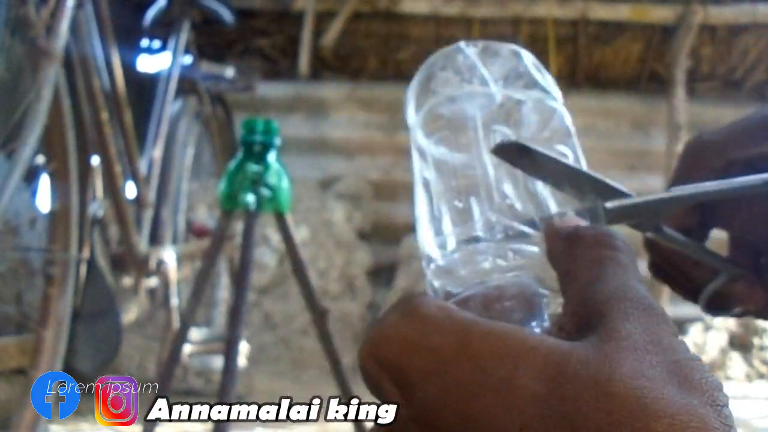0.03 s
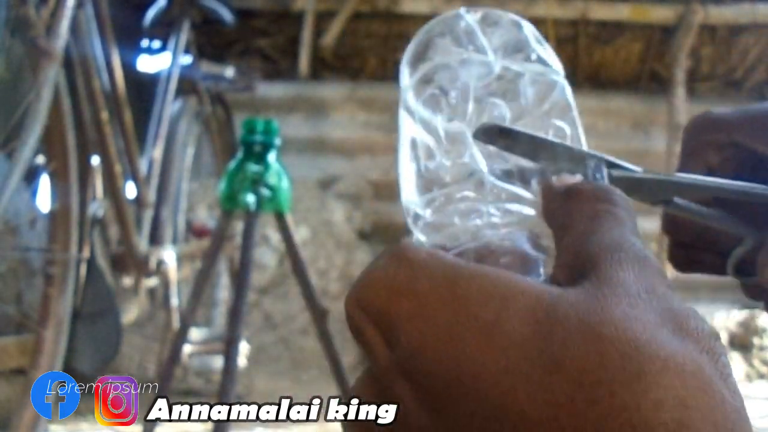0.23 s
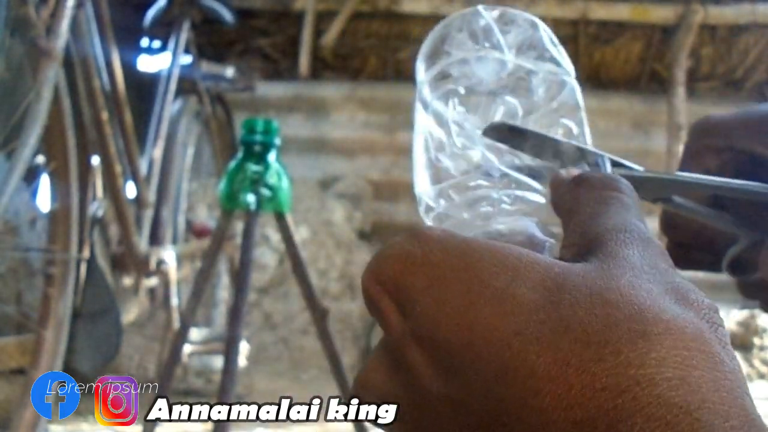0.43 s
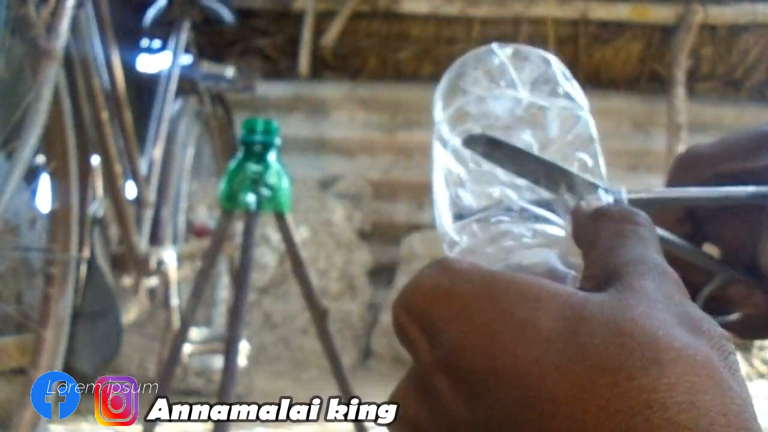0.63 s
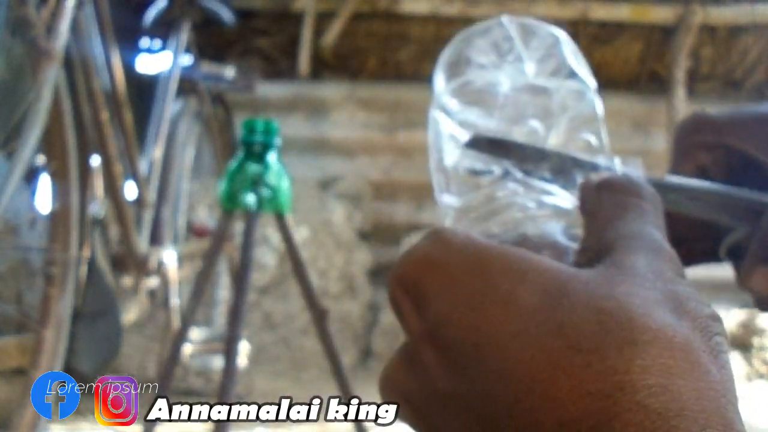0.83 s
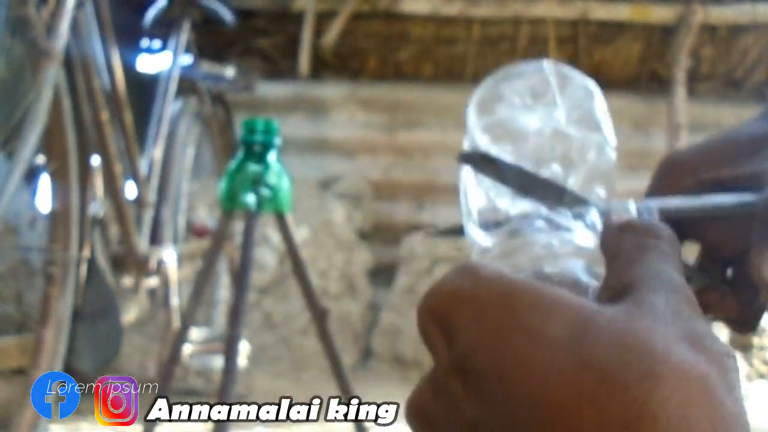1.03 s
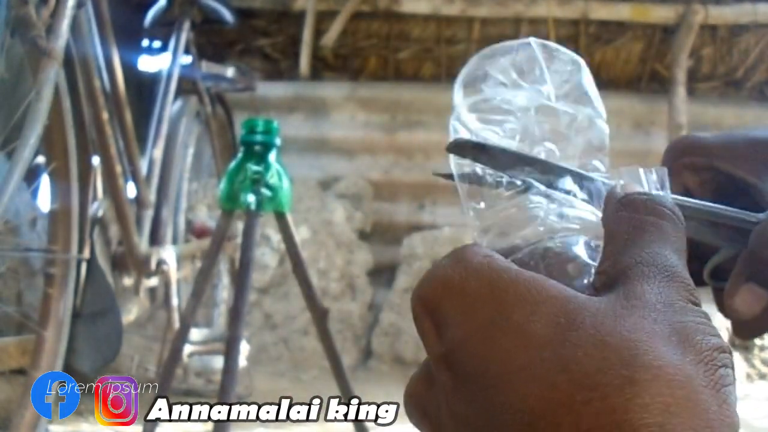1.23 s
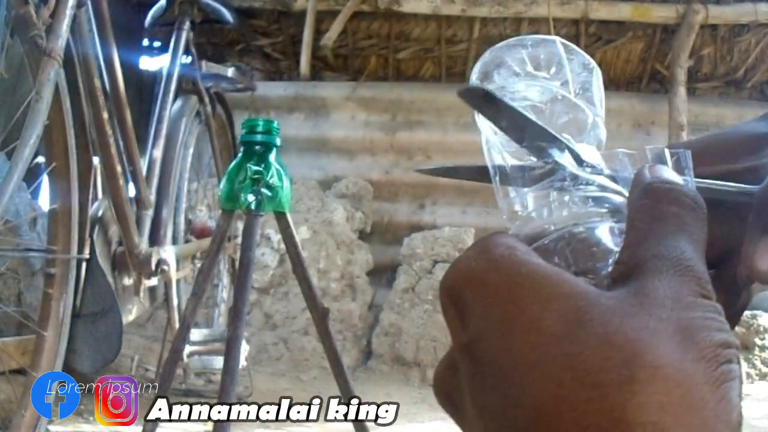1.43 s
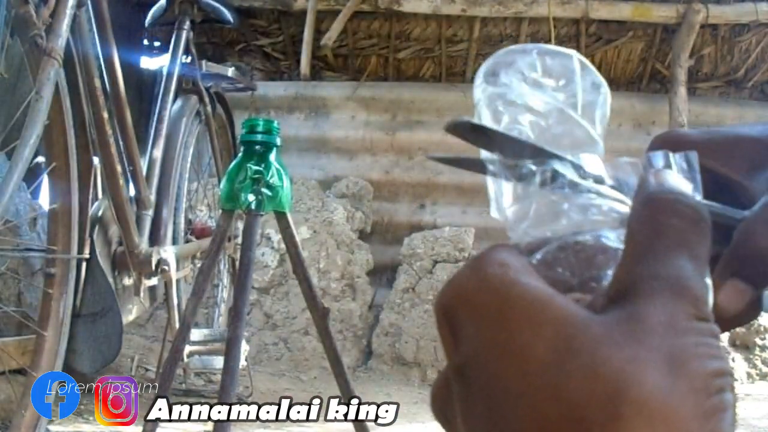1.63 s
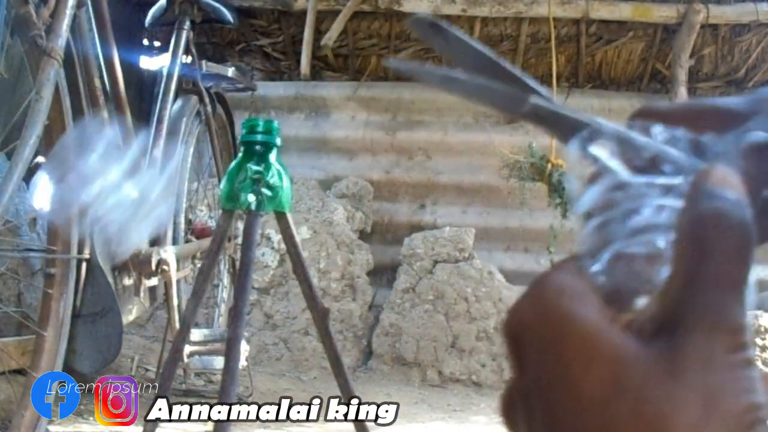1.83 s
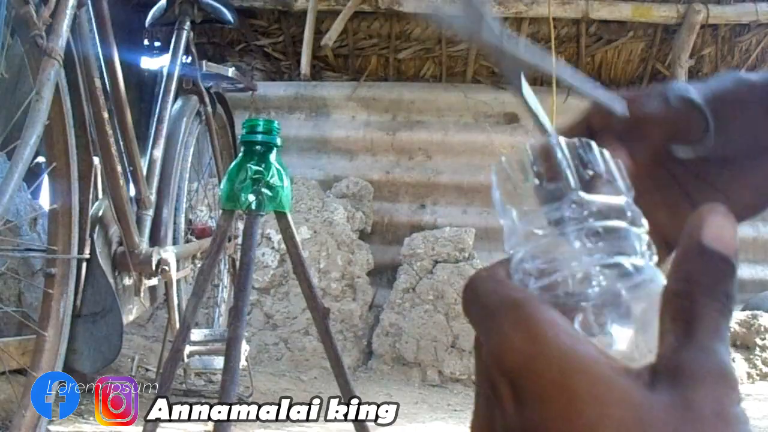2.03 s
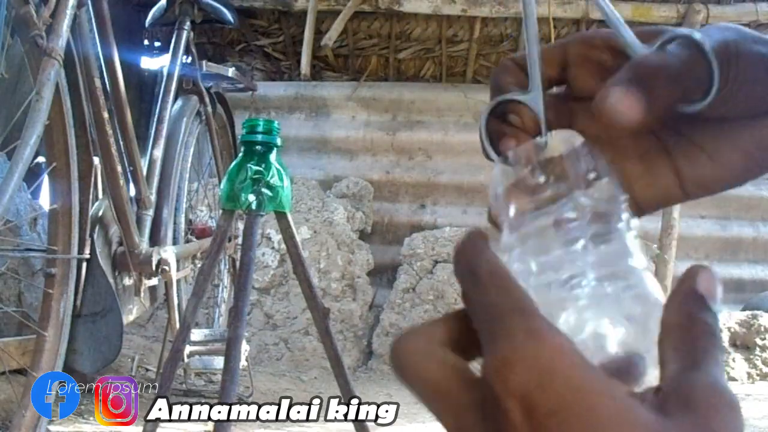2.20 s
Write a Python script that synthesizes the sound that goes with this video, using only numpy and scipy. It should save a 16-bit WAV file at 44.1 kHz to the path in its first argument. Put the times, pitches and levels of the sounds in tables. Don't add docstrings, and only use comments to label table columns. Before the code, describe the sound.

Close, crisp scissor cuts crackle through a thin plastic bottle, ending in a rattling flurry of pops

```python
import sys
import numpy as np
from scipy import signal
from scipy.io import wavfile
from scipy.ndimage import uniform_filter1d

SR = 44100
rng = np.random.default_rng(int(sys.argv[2]) if len(sys.argv) > 2 else 0)


def store_pcm(level_fs):
    pcm = np.round(np.clip(level_fs, -1, 1) * 32767).astype(np.int16)
    wavfile.write(sys.argv[1], SR, np.atleast_2d(pcm).T)


def decibels_to_gain(level_db):
    exponent = np.asarray(level_db, float) / 20
    return 10 ** exponent


N = 99798

# t/s, peak level/dB, low panel f/Hz, high panel f/Hz, high level re low/dB
SNAPS = [(0.165, -19, 1090, 2500, -10), (0.408, 0.5, 905, 2198, 8.5), (0.409, -1, 1593, 3257, 12),
         (1.237, -0.5, 1226, 3300, 6.5), (1.238, -1.5, 805, 2268, 12), (1.628, -8, 836, 2400, -12),
         (1.63, -8, 1335, 2070, -12.5), (1.635, -20.5, 863, 1360, -31), (1.721, -9, 1287, 2790, -1.5),
         (1.738, -2, 1084, 3164, 10.5), (1.744, -2, 1030, 1880, 0.5), (1.749, -17, 1120, 3300, 14),
         (1.95, -1, 1176, 2940, 4.5), (1.951, -10.5, 1180, 1900, 7), (2.077, -8.5, 1472, 1900, -19),
         (2.114, -9, 1422, 2820, -37), (2.119, -6.5, 1060, 1740, -50), (2.128, -15.5, 1160, 1990, -13.5)]
CRACKS = [(0.115, -12, 1260, 2100, 3), (0.1565, -5.5, 1510, 2700, 11.6), (0.3575, -11.5, 1265, 2020, 0.82),
          (0.697, -13.5, 1340, 1840, 5), (0.794, -19.5, 1480, 3320, 3.8), (0.8, -16, 1220, 2080, 6.2),
          (0.961, -12, 1460, 2120, 19), (0.978, -11.5, 1500, 1870, 2.3), (1.253, -2.5, 765, 3100, 10.4),
          (1.329, -4.5, 900, 3110, 10), (1.33, -7, 1400, 2200, 0.63), (0.157, -24, 2040, 3700, 1.2),
          (1.869, -17, 1006, 1990, 0.43)]
TICKS = [(0.09, -36.5, 1260, 1930, 29), (0.235, -32, 1710, 2780, 8), (0.293, -39.5, 1090, 3380, 12),
         (0.337, -28.5, 560, 2500, 2), (0.346, -29, 1380, 1870, 18), (0.469, -28, 1240, 2900, 4),
         (0.488, -21.5, 930, 1930, 3), (0.492, -23.5, 1230, 1900, -9), (0.509, -20.5, 876, 2570, -23),
         (0.532, -19.5, 1110, 2460, 19), (0.484, -33, 1180, 3000, 1), (0.555, -26.5, 980, 2400, 1),
         (0.625, -43, 920, 2300, -6), (0.664, -24.5, 810, 1870, 5.5), (0.682, -25, 1330, 1860, -2),
         (0.731, -35.5, 1480, 4200, 12), (0.765, -24, 830, 3200, 2.5), (0.825, -29.5, 1580, 2780, 21),
         (0.85, -47, 880, 3500, -2), (0.893, -47.5, 1120, 2100, 8), (0.929, -36, 1360, 2260, 11),
         (0.936, -36, 1350, 2900, 3), (1.305, -44, 1400, 3170, -8), (0.947, -23.5, 1560, 4300, 31),
         (0.9995, -20, 1400, 3200, 14), (1.155, -32, 835, 2960, -1), (1.183, -21, 1390, 3300, 29.5),
         (1.223, -22, 1180, 2200, 19), (1.392, -26.5, 895, 2220, 2), (1.405, -18, 940, 3260, 10),
         (1.446, -26, 1390, 3200, -2), (1.502, -40.5, 1170, 3200, 10), (1.537, -19, 870, 3200, 18),
         (1.548, -28.5, 930, 3300, -1), (1.557, -28, 898, 3300, -25), (1.572, -30.5, 1290, 3200, -20),
         (1.587, -39.5, 1460, 3200, 4), (2.18, -46, 900, 4200, -9), (1.825, -33, 1430, 1870, -12.5),
         (2.21, -24, 1296, 2060, -15.5)]
# start t/s, length/s, level/dB, peak position/fraction of length, treble level/dB
STROKES = [(0.128, 0.076, -35.5, 0.56, -5.5), (0.195, 0.14, -47, 0.24, 0), (0.316, 0.041, -53.5, 0.41, 0.5),
           (0.408, 0.049, -37, 0.14, 8.5), (0.448, 0.039, -41, 0.6, -3), (0.48, .11, -30, 0.23, -3),
           (0.629, 0.13, -41, 0.63, 0), (.75, 0.072, -32.5, 0.74, 0.5), (0.843, 0.029, -52, .2, 0),
           (0.929, 0.054, -34.5, 0.72, 1), (0.973, 0.083, -26, 0.59, 0.5), (1.05, 0.055, -50.5, 0.13, -5),
           (1.126, 0.24, -40, 0.083, -1.5), (1.211, 0.078, -36.5, 0.42, -2), (1.379, 0.14, -35.5, 0.48, 1),
           (1.532, 0.13, -41.5, 0.12, -3.5), (1.596, 0.11, -39.5, 0.41, -5),
           (1.689, 0.058, -45.5, 0.82, -4), (1.735, 0.035, -26.5, 0.05, 7), (2.078, 0.13, -42, 0.039, -23)]
# f/Hz, width/Hz, level/dB
WALL = [(432, 306, 4), (620, 434, 9.5), (830, 262, 8.5), (1400, 258, 9.5), (2010, 805, 3), (2795, 496, 5.5),
        (3300, 765, -1.5), (4440, 560, -8), (6320, 460, -18.5), (7970, 586, -10), (9550, 370, -41.5)]
WALL_DRIFT = [-9, -11, -0.2, -0.24, 0.5, 0.47, 0.83, -1.7, -1.2, 0.1, 11.2]
# f/Hz, level/dB, T60/s
CUP_MODES = [(465, -17, .15), (650, -27.5, .1), (1087, 0, .15), (1180, -8.5, 0.54), (1421, -14, 0.34),
             (1561, -10, 0.089), (1900, -2, 0.047), (1950, -26.5, 0.33), (2070, -14.5, 0.17),
             (2580, -13.5, 0.087), (3200, -27, 0.11), (3500, -38, 0.068), (4730, -46, 0.15)]
# t/s, level/dB
CUP_HITS = [
    (1.251, -54),
    (1.628, -36),
    (1.736, -24.5),
    (1.867, -42.5),
    (1.952, -34.5),
    (2.079, -23),
    (2.118, -17),
]
# f/Hz, level/dB, T60/s
BLADE_MODES = [(6700, -12, .08), (7550, -23, .15), (8000, -18, 0.044), (8400, 2, 0.058), (9100, -2, 0.15),
               (9100, -14, .15), (9580, -5, .12), (9945, 12, 0.1)]
# t/s, level/dB
BLADE_HITS = [
    (1.738, -60),
    (1.951, -63),
    (2.076, -58),
    (2.115, -51.5),
]
# f/Hz, level/dB, T60/s
SETTLE_MODES = [(369, 0, 0.31)]
# t/s, level/dB
SETTLE_HITS = [(2.164, -52)]
# t/s, level/dB, time to peak/ms
PUFFS = [
    (0.41, -8.5, 0.32),
    (1.237, -44, 0.62),
    (1.63, -58, 0.93),
    (1.738, -30, 0.56),
    (1.948, -57, 2.6),
    (0.164, -45, 0.93),
]
# t/s, level/dB, f/Hz
THUNKS = [(0.18, -34.5, 216), (.26, -35.5, 450), (0.32, -33, 460), (.358, -24, 406), (2.1, -18.5, 560),
          (2.4, -23.5, 290), (.766, -31.5, 510), (0.69, -24, 516), (1.872, -30, 298), (2.086, -40, 315)]
# f/Hz, level/(dB per Hz)
SHED_SPECTRUM = [(30, 6.5), (100, -0.5), (300, 5.5), (700, 5.5), (1500, 0.5), (3000, -10.5), (5500, -54),
                 (9000, -58)]
# f/Hz, level/dB
HUM = [(1421, -59), (1933, -65.5)]
# t/s, level/dB
HUM_SWELL = [(0, -0.3), (.3, -13), (1.6, -10.5), (1.8, -2.7)]
# f/Hz, width/Hz, depth/fraction
PORT_DIP = (5840, 2040, 0.2)


def band(x, hz, width):
    return signal.lfilter(*signal.iirpeak(hz, hz / width, fs=SR), x)


def unit(x):
    return x / np.sqrt(np.mean(x ** 2))


def fade(t, t60):
    return np.exp(-np.log(1000) * t / t60)


def tone(hz, t):
    return np.sin(2 * np.pi * hz * t)


def add(out, at, x):
    i = int(at * SR)
    out[i:i + len(x)] += x[:len(out) - i]


def wall(drive):
    drive = np.broadcast_to(drive, (len(WALL), N))
    rows = []
    for k, (hz, width, db) in enumerate(WALL):
        sign = (-1) ** k
        rows.append(sign * decibels_to_gain(db) * band(drive[k], hz, width))
    rows = np.array(rows) * decibels_to_gain(np.outer(WALL_DRIFT, np.arange(N) / SR))
    highpass = signal.butter(2, 560, "high", fs=SR, output="sos")
    rows[2:] = signal.sosfilt(highpass, rows[2:])
    return rows


def buckles():
    panel_t60_s, high_t60_s, rise_s = 0.036, 0.017, 0.002
    crack_t60_s, rattle_t60_s, rattle_db = 0.017, 0.057, -29
    split_t60_s, split_db, crack_lows_db = 0.0038, -27.5, -5
    t = np.arange(SR // 8) / SR
    rings, cracks, splits = np.zeros((3, N))
    for table, ring, crack_db in ((SNAPS, 0.8, -6), (CRACKS, 0.52, -7.5), (TICKS, 0.65, -7.5)):
        rise = 1 - fade(t, rise_s * ring)
        crack = decibels_to_gain(crack_db) * fade(t, crack_t60_s * ring)
        rattle = decibels_to_gain(rattle_db) * fade(t, rattle_t60_s)
        split = decibels_to_gain(crack_db + split_db) * fade(t, split_t60_s)
        for at, db, low_hz, high_hz, high_db in table:
            low = tone(low_hz, t) * fade(t, panel_t60_s * ring)
            high = tone(high_hz, t) * fade(t, high_t60_s * ring)
            panels = low * decibels_to_gain(-max(high_db, 0)) + high * decibels_to_gain(min(high_db, 0))
            add(rings, at, decibels_to_gain(db) * rise * panels)
            noise = rng.standard_normal(len(t)) * decibels_to_gain(db + min(high_db, 0) / 2)
            add(cracks, at, noise * rise * (crack + rattle))
            add(splits, at, noise * split)
    rows = 3 * wall(cracks)
    through_wall = decibels_to_gain(crack_lows_db) * rows[:3].sum(axis=0) + rows[3:].sum(axis=0)
    return rings + through_wall + band(splits, 9000, 4200)


def shear():
    grit_per_s, spread_db, largest_db = 1500, 3.8, 14
    smooth_db, flicker_db, shared = -2.5, 2.5, 0.68
    t = np.arange(N) / SR
    low, high = np.zeros((2, N))
    for at, length, db, peak, treble_db in STROKES:
        u = (t - at) / length
        attack = np.clip(u / peak, 0, 1) ** 0.84
        release = np.clip((1 - u) / (1 - peak), 0, 1) ** 1.06
        push = attack * release
        low += decibels_to_gain(db) * push
        high += decibels_to_gain(db + treble_db) * push
    chance = rng.random((3, len(WALL) + 1, N))
    size_db = np.minimum(-spread_db * np.log(chance[2] + 1e-9), largest_db)
    occurs = chance[0] < grit_per_s / SR
    grit = unit(occurs * np.sign(chance[1] - 0.5) * decibels_to_gain(size_db))
    grit = grit + decibels_to_gain(smooth_db) * rng.standard_normal(grit.shape)
    flicker = unit(uniform_filter1d(rng.standard_normal(grit.shape), size=300))
    grit = grit * decibels_to_gain(flicker_db * flicker)
    grit = shared * grit[0] + (1 - shared) * grit[1:]
    push = np.array([high if hz > 2300 else low for hz, _, _ in WALL])
    steady = wall(grit).sum(axis=0)
    return wall(grit * push).sum(axis=0) / np.std(steady)


def struck(modes, hits, longest_s):
    waver_db, waver_size = 3.5, int(0.008 * SR)
    t, out = np.arange(int(longest_s * SR)) / SR, np.zeros(N)
    rise = 1 - fade(t, 0.0072)
    for at, hit_db in hits:
        chance = rng.standard_normal((len(modes), 2))
        waver = uniform_filter1d(rng.standard_normal((len(modes), len(t))), size=waver_size)
        waver = waver_db * unit(uniform_filter1d(waver, size=waver_size))
        ring = np.zeros(len(t))
        for (hz, mode_db, t60), (strength, detune), w in zip(modes, chance, waver):
            level = decibels_to_gain(hit_db + mode_db + 4.4 * strength + w)
            ring += level * tone(hz * (1 + 0.0038 * detune), t) * fade(t, min(t60, longest_s))
        add(out, at, ring * rise)
    return out


def cup():
    return struck(CUP_MODES, CUP_HITS, 0.25) + struck(SETTLE_MODES, SETTLE_HITS, 0.25)


def blades():
    return struck(BLADE_MODES, BLADE_HITS, 0.13)


def puffs():
    t, out = np.arange(SR // 10) / SR, np.zeros(N)
    for at, db, peak_ms in PUFFS:
        u = t * 1e3 / peak_ms
        add(out, at, decibels_to_gain(db) * u * np.exp(1 - u))
    for at, db, hz in THUNKS:
        add(out, at, decibels_to_gain(db) * tone(hz, t) * fade(t, 0.032))
    wind = unit(band(rng.standard_normal(N), 15, 11))
    return out + decibels_to_gain(-66) * wind


def echo(source):
    t = np.arange(SR // 3) / SR
    tail = band(rng.standard_normal(len(t)), 1400, 3500) * fade(t, 0.15)
    tail = tail * (t > 0.004)
    tail = tail / np.sqrt(np.sum(tail ** 2))
    return decibels_to_gain(-28.5) * signal.fftconvolve(source, tail)[:N]


def shed():
    air, t = np.zeros(N), np.arange(N) / SR
    spectrum_hz, spectrum_db = np.array(SHED_SPECTRUM).T
    for hz in 30 * 2 ** np.arange(0, 8.4, 0.5):
        db = np.interp(np.log(hz), np.log(spectrum_hz), spectrum_db)
        db = db + 2.2 * unit(uniform_filter1d(rng.standard_normal(N), size=4000))
        air += decibels_to_gain(db) * band(rng.standard_normal(N), hz, hz / 3)
    swell = decibels_to_gain(np.interp(t, *np.array(HUM_SWELL).T))
    hum = sum(decibels_to_gain(db) * tone(hz, t) for hz, db in HUM)
    return decibels_to_gain(-59) * unit(air) + swell * hum


def scene():
    bottle = buckles() + shear() + cup() + blades()
    return (bottle + echo(bottle) + puffs() + shed())[None]


def band_limit(x):
    return signal.sosfilt(signal.butter(12, 16640, fs=SR, output="sos"), x)


def record(dry):
    clip, mirror_db = 0.52, -6
    x = clip * dry / (clip ** 4 + dry ** 4) ** 0.25
    port_hz, port_width, depth = PORT_DIP
    x = x - depth * band(x, port_hz, port_width)
    x = signal.sosfilt(signal.ellip(6, 0.5, 42, 9900, fs=SR, output="sos"), x)
    image = x * (-1.0) ** np.arange(N)
    image = signal.sosfilt(signal.ellip(8, 0.3, 70, 15700, fs=SR, output="sos"), image)
    return band_limit(x + decibels_to_gain(mirror_db) * image)


dry = scene()
out = record(dry)
store_pcm(out)
```